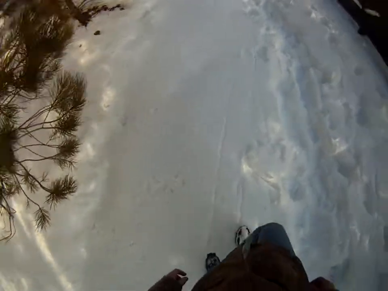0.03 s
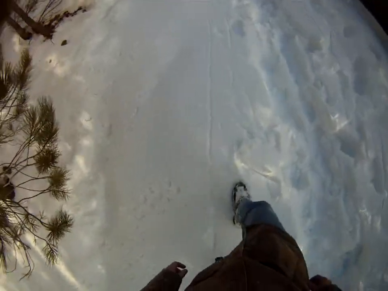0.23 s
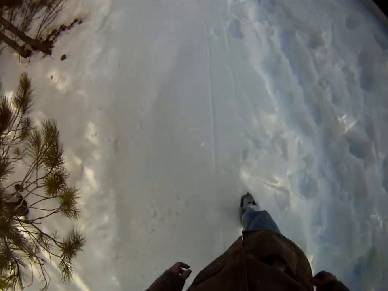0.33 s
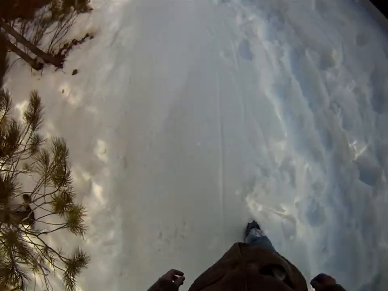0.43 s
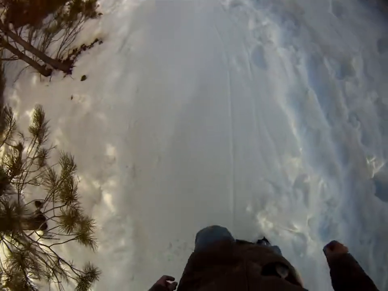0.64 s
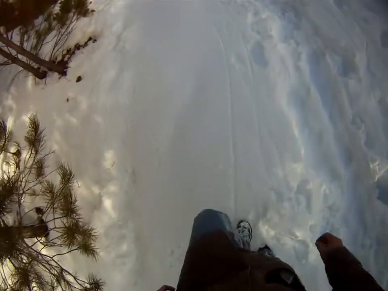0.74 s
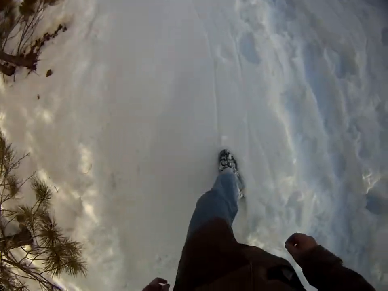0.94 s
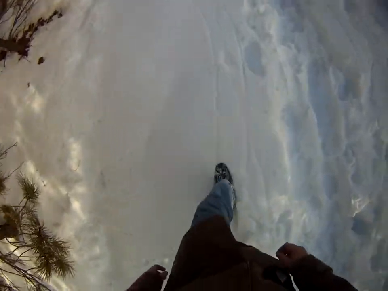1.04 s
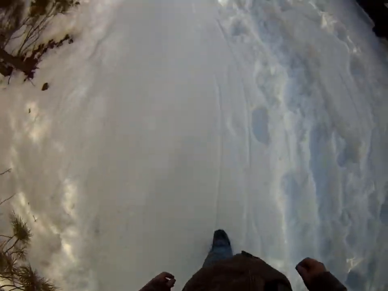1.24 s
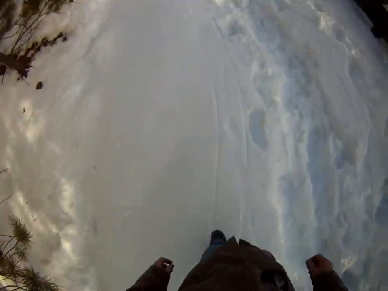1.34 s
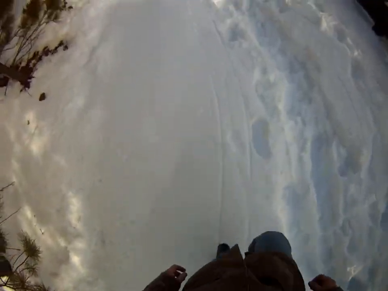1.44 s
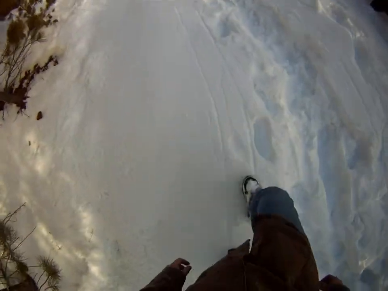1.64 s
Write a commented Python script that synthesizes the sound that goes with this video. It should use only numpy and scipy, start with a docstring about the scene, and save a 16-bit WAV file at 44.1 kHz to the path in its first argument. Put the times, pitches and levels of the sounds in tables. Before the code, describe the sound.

Footsteps thump on packed snow, crunching faintly, and jolt a loose plastic camera mount into three sharp knocks, the last loudest. Clothes swish softly over low wind rumble and thin hiss, close to a body-worn microphone outdoors.

```python
"""Footsteps thump and rattle on faintly crunching snow, over swishing clothes, a rumble and a thin hiss.
Someone walks on packed snow with a small camera worn on the body. Each step shakes the body and
knocks the loose plastic camera mount, which also sways with a low hum. Clothes and a strap rub.
The camera holds its sound samples at a low rate, which adds a glassy edge to every knock."""
import sys
import numpy as np
from scipy import signal
from scipy.fft import rfft, irfft
from scipy.io import wavfile
from scipy.ndimage import uniform_filter1d

SR = 44100
rng = np.random.default_rng(int(sys.argv[2]) if len(sys.argv) > 2 else 0)


def dump_mix(stems):
    """Bounce the given channels to the path in sys.argv[1] as a 16-bit WAV at rate SR."""
    frames = np.atleast_2d(stems).T  # one column per channel
    limited = np.clip(frames, -1, 1)  # hard clip at full scale
    pcm = np.round(limited * 32767).astype(np.int16)
    wavfile.write(sys.argv[1], SR, pcm)


N = 74970


def undb(db):
    """Turn decibels into a gain to multiply by."""
    return 10 ** (np.asarray(db) / 20)


def unit(x):
    """Scale x to an average strength (rms) of 1."""
    return x / np.sqrt(np.mean(x ** 2))


def clock():
    """The time of every sample in seconds."""
    return np.arange(N) / SR


def fader(points):
    """A gain that follows points of t/s, level/dB."""
    return undb(np.interp(clock(), *np.array(points).T))


def colour(x, points):
    """Shape the tone of x by points of f/Hz, level/dB, fading below the first; the result has rms 1."""
    hz, db = np.array(points).T
    f = np.maximum(np.fft.rfftfreq(N, 1 / SR), 1)
    gain = undb(np.interp(np.log(f), np.log(hz), db)) * np.minimum(f / hz[0], 1) ** 2
    return unit(irfft(rfft(x) * gain, N))


def noise(spectrum):
    """Steady noise with the given tone and rms 1."""
    return colour(rng.standard_normal(N), spectrum)


def lowpass(x, hz, order):
    """Soften everything above hz; a higher order cuts more steeply."""
    return signal.sosfilt(signal.butter(order, min(hz, SR / 2 - 1), fs=SR, output="sos"), x)


def drift(rate_hz):
    """A smooth random wobble with rms 1."""
    span = int(SR / rate_hz)
    steps = np.repeat(rng.standard_normal(N // span + 1), span)
    return unit(uniform_filter1d(uniform_filter1d(steps, span), span)[:N])


def ring(modes, t, wave, detune=1):
    """Add up an object's fading tones (modes); each falls by 60 dB in its ring time."""
    return sum(undb(db) * wave(2 * np.pi * hz * ratio * t) * np.exp(-np.log(1000) * t / ring_s)
               for (hz, db, ring_s), ratio in zip(modes, detune * np.ones(len(modes))))


def add(out, at, sound):
    """Mix a short sound into out, starting at a time in seconds."""
    start = int(np.clip(round(at * SR), 0, N - len(sound)))
    out[start:start + len(sound)] += sound


def hiss():
    """The air and the microphone make a faint, even noise."""
    # loudness of the hiss: t/s, level/dB
    loudness = [(0, -61), (.4, -58.5), (.72, -60), (1.05, -58), (1.42, -62), (1.7, -57)]
    # tone of the hiss: f/Hz, level/dB
    spectrum = [(50, 3), (100, -2.5), (170, -4), (240, -5), (330, -7.5), (610, -10), (800, -13.5),
                (1300, -12), (2000, -11), (2800, -15.5), (3700, -17.5), (5600, -20.5)]
    return fader(loudness) * noise(spectrum)


def rumble():
    """The mount sways near one low pitch while moving air buffets the microphone."""
    # loudness of sway and wind together: t/s, level/dB
    loudness = [(0, -60.5), (.098, -45), (.15, -56), (.25, -31.5), (.35, -49), (.458, -27.5), (.53, -36),
                (.595, -28), (.66, -41), (.742, -45.5), (.83, -45), (.97, -39), (1.12, -40), (1.29, -33.5),
                (1.38, -48), (1.5, -58.5), (1.6, -55.5), (1.67, -43.5), (1.7, -54)]
    # tone of the wind on the microphone: f/Hz, level/dB
    wind_spectrum = [(12, 22), (30, -16.5), (55, -6), (85, -8.5), (120, -15), (250, -59), (600, -66)]
    pitch_hz = 38.64 * (1 + 0.092 * drift(rate_hz=11))
    sway = np.sqrt(2) * np.sin(2 * np.pi * np.cumsum(pitch_hz) / SR)
    wind = undb(-6.5) * noise(wind_spectrum)
    return fader(loudness) * (sway + wind)


def friction(strokes, spectrum, flutter_db):
    """Sliding fabric makes noise in soft, slightly uneven swells."""
    swells = sum(undb(db) * np.exp(-((clock() - at) / half) ** 2) for at, half, db in strokes)
    flutter = undb(flutter_db * drift(rate_hz=89.4))
    return swells * flutter * noise(spectrum)


def clothing():
    """Cloth slides over cloth and swishes as the walker moves."""
    # swishes: middle t/s, half length/s, level/dB
    swishes = [(.135, 0.097, -59.5), (.878, 0.051, -57.5), (1.02, 0.12, -66), (1.68, 0.054, -56)]
    # tone of the cloth: f/Hz, level/dB
    spectrum = [(300, -40), (900, 0), (1500, -13), (2050, 13.5), (2750, -14), (3600, 10.5), (4500, -10),
                (5300, 10), (5800, -7.5)]
    return friction(swishes, spectrum, flutter_db=2.8)


def strap():
    """The strap rubs on the camera's case."""
    # rubs: middle t/s, half length/s, level/dB
    rubs = [(.57, 0.11, -61.5), (1.033, 0.012, -52.5)]
    # tone of the strap: f/Hz, level/dB
    spectrum = [(200, 6), (700, -2.5), (1250, 7.5), (1600, 4), (2050, 14), (2700, -5.5), (5500, -14)]
    return friction(rubs, spectrum, flutter_db=1.5)


def snow_crunch():
    """Snow breaks under the boot in bursts of tiny cracks: a broad crackle and a narrow creak."""
    # crunches: t/s, length/s, crackle level/dB, creak level/dB
    crunches = [(0.28, 0.015, -44.5, -51), (0.296, 0.016, -60, -61.5), (0.493, 0.013, -59, -61),
                (.542, 0.0054, -49.5, -56.5), (0.973, 0.01, -65, -58.5), (1.166, 0.0098, -48, -54),
                (1.247, 0.0079, -53, -54.5), (1.26, 0.011, -64.5, -59), (1.373, 0.0072, -68, -58.5)]
    # tone of the crackle: f/Hz, level/dB
    crackle_spectrum = [(150, -12), (350, 1), (700, -20), (1300, -7), (1950, 10.5), (2400, -0.5),
                        (3050, -13), (3600, 3), (4100, -12.5), (4700, 2), (5600, -15.5)]
    # tone of the creak: f/Hz, level/dB
    creak_spectrum = [(1500, -22), (2300, -5.5), (2630, 0.5), (3000, -21.5), (4200, -35), (4700, -14),
                      (5200, -26)]
    cracks_per_s, rise_s, fall_s = 1400, 0.00052, 0.0018
    t, out = clock(), np.zeros(N)
    cracks = (rng.random((2, N)) < cracks_per_s / SR) * rng.standard_normal((2, N))
    crackle, creak = colour(cracks[0], crackle_spectrum), colour(cracks[1], creak_spectrum)
    for at, length, crackle_db, creak_db in crunches:
        press = np.clip((t - at) / rise_s, 0, 1)
        release = np.exp(-np.maximum(t - at - length, 0) / fall_s)
        out += press * release * (undb(crackle_db) * crackle + undb(creak_db) * creak)
    return out


def footfalls():
    """The walker's weight lands with a dull thud, and the body shakes the camera for a few slow cycles."""
    # thumps: t/s, shake level/dB, thud level/dB
    thumps = [(0.21, -31.5, -33), (0.285, -36.5, -49.5), (.779, -26.5, -69), (.878, -37, -51),
              (0.943, -34, -50), (1.128, -25, -56), (1.158, -18, -63), (1.368, -37.5, -81),
              (1.608, -44, -76)]
    # deep tones of the body and mount: f/Hz, level/dB, ring time/s
    body_modes = [(38.8, 10, 0.13), (74.1, -5, 0.26), (125, -16, 0.094)]
    # tone of the thud: f/Hz, level/dB
    thud_spectrum = [(70, 4.5), (130, -7.5), (170, -13.5), (240, -29.5), (480, -32), (1000, -66)]
    shake_rise_s, thud_rise_s, thud_fall_s = 0.0056, 0.006, 0.045
    out, thud_noise = np.zeros(N), noise(thud_spectrum)
    for at, shake_db, thud_db in thumps:
        age = np.maximum(clock() - at, 0)
        shake = (1 - np.exp(-age / shake_rise_s)) * ring(body_modes, age, np.sin)
        thud = (1 - np.exp(-age / thud_rise_s)) * np.exp(-age / thud_fall_s) * thud_noise
        out += undb(thud_db) * thud - undb(shake_db) * shake
    return out


def mount_knocks():
    """The loose joint slips with a scrape, then strikes: the case rings and the mount gives a dull thock."""
    # knocks: t/s, level/dB, treble cutoff f/Hz, thock level/dB
    knocks = [(.2109, -31.5, 2570, -52), (.2123, -31, 2480, -53), (.2145, -32.5, 2340, -48),
              (.2211, -36, 1840, -40), (.2824, -50.5, 1520, -38), (.7698, -26, 2800, -46),
              (.7723, -14, 3800, -36.5), (.7752, -31, 3240, -70), (0.8733, -41.5, 2400, -63),
              (0.8807, -35, 2060, -31), (1.1260, -14.5, 3300, -56), (1.1360, -13, 3360, -45),
              (1.1424, -12.5, 3240, -41), (1.1694, -31.5, 2580, -45)]
    # tones of the camera's case: f/Hz, level/dB, ring time/s
    case_modes = [(467, -19, 0.015), (860, -32, 0.016), (1037, 2.5, 0.013), (1280, -6, 0.02),
                  (1637, -2.5, 0.0068), (2055, 2, 0.014), (3330, -10.5, 0.018)]
    # low tones of the mount: f/Hz, level/dB, ring time/s
    mount_modes = [(213, 0, 0.011), (364, -3.5, 0.011)]
    # tone of the scrape in the joint: f/Hz, level/dB
    scrape_spectrum = [(1500, 2), (2700, -13), (3500, -2.5), (4600, -16.5), (5250, -10), (5900, -23)]
    slip_lead_s, slip_width_s, slip_strength = 0.00038, 0.00032, 1.74
    scrape_db, scrape_fall_s = -24.5, 0.004
    dead_hz, dead_width_hz = 2636, 1050  # a band where the case hardly rings
    out, scrape_noise = np.zeros(N), noise(scrape_spectrum)
    t = clock()[:SR // 20]
    run_up_s = 2 * slip_lead_s
    until_strike = run_up_s - t[t < run_up_s]
    notch = signal.iirnotch(dead_hz, dead_hz / dead_width_hz, fs=SR)
    thock = lowpass(ring(mount_modes, t, np.cos), hz=760, order=4)
    for k, (at, db, cutoff_hz, thock_db) in enumerate(knocks):
        stretch = 2 ** ((db + 12) / 18)  # slip times hold at -12 dB and double for a blow 18 dB harder
        slip = np.exp(-((until_strike / stretch - slip_lead_s) / slip_width_s) ** 2 / 2)
        force = np.append(-slip_strength * slip / slip.sum(), 1)  # a soft pull, then a sharp hit
        detune = 1 + 0.012 * rng.standard_normal(len(case_modes))
        ringing = signal.lfilter(*notch, ring(case_modes, t, np.cos, detune))
        clack = lowpass(ringing, cutoff_hz, order=6)
        scrape = np.exp(-t / scrape_fall_s) * scrape_noise[k * len(t):(k + 1) * len(t)]
        add(out, at - run_up_s, undb(db) * np.convolve(force, clack / np.abs(clack).max()))
        add(out, at, undb(thock_db) * thock / np.abs(thock).max())
        add(out, at - slip_lead_s, undb(db + scrape_db) * scrape)
    return out


def scene():
    """Everything is close to one microphone, with no echo over the snow."""
    fabric = clothing() + strap()
    return (mount_knocks() + footfalls() + snow_crunch() + fabric + rumble() + hiss())[None]


def record(dry):
    """The camera cuts the treble, then holds each sample, which adds a glassy, high mirror image."""
    input_top_hz, hold_hz, output_top_hz = 5650, 12000, 15400
    narrow = lowpass(dry, input_top_hz, order=20)
    narrow = signal.sosfilt(signal.butter(1, 8, "high", fs=SR, output="sos"), narrow)  # cut below 8 Hz
    mirrored = narrow * (1 + 2 * np.cos(2 * np.pi * hold_hz * clock()))  # copies either side of hold_hz
    droop = np.sinc(np.fft.rfftfreq(2 * N, 1 / SR) / hold_hz)  # holding also weakens the highs
    held = irfft(rfft(mirrored, 2 * N) * droop, 2 * N)[:, :N]
    return signal.sosfilt(signal.ellip(8, .2, 70, output_top_hz, fs=SR, output="sos"), held)


dry = scene()
out = record(dry)
dump_mix(out)
```